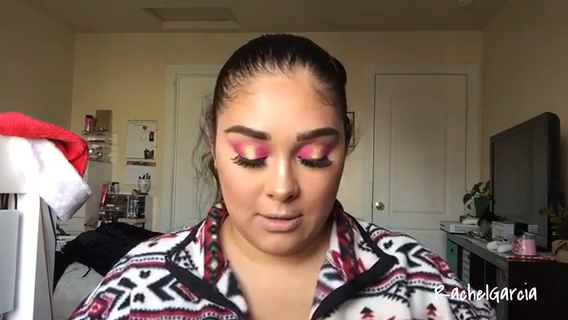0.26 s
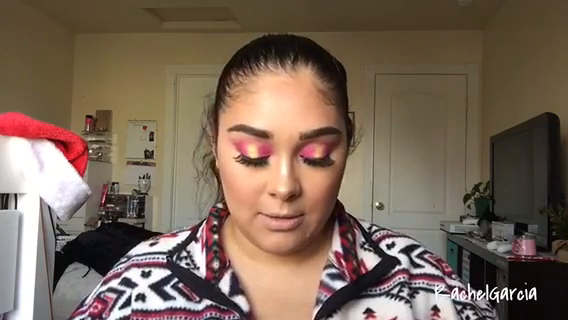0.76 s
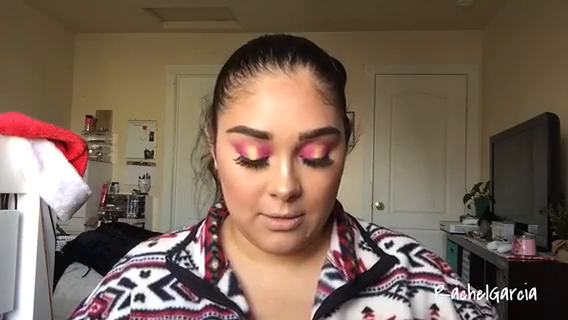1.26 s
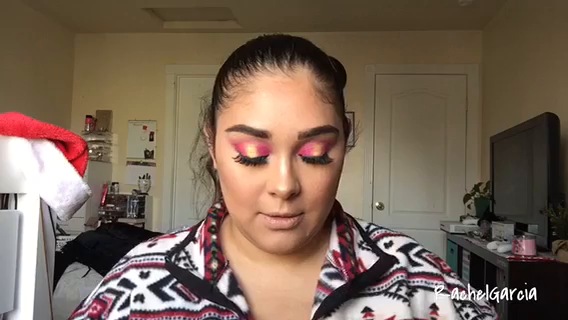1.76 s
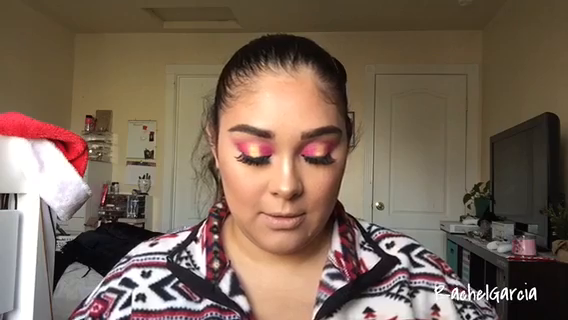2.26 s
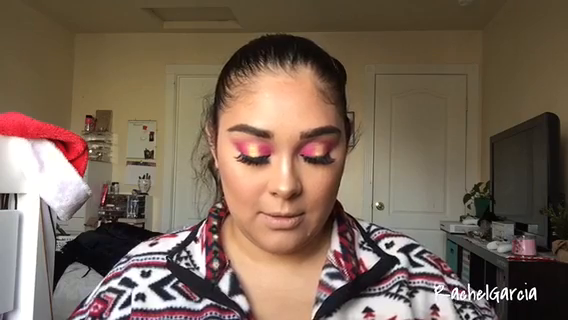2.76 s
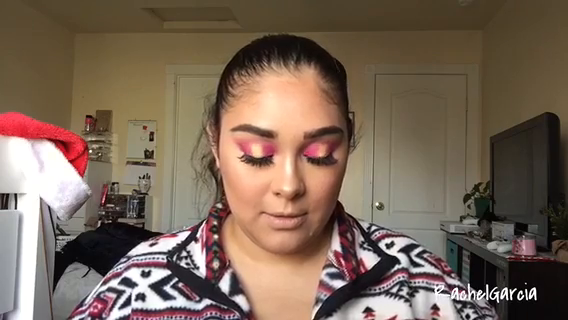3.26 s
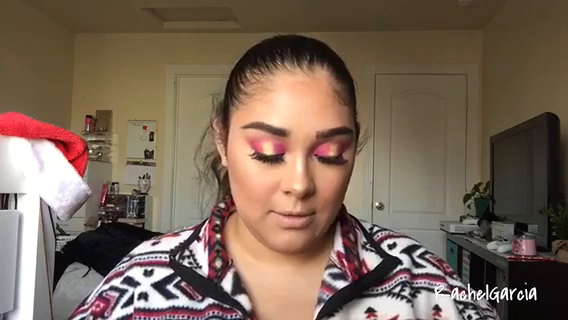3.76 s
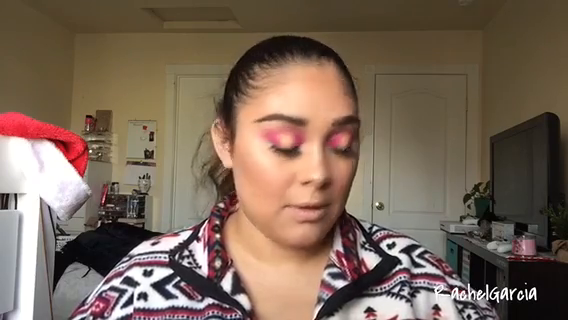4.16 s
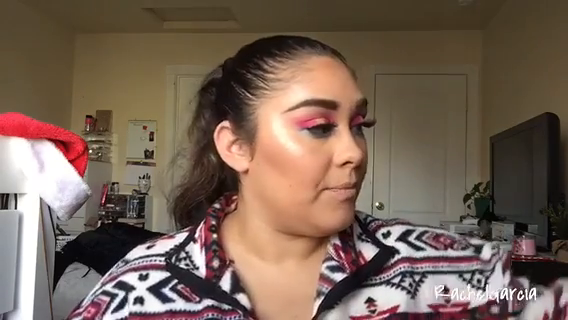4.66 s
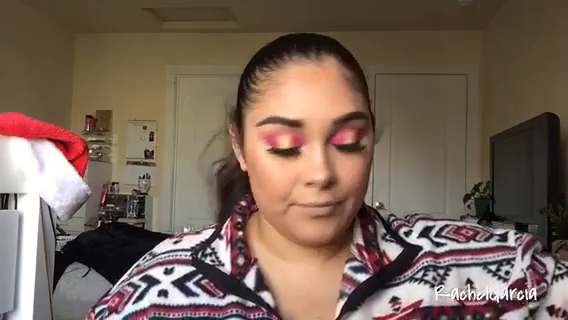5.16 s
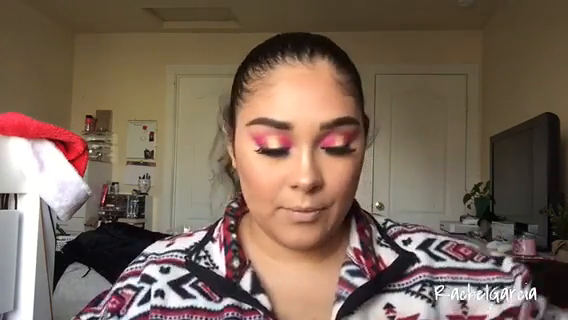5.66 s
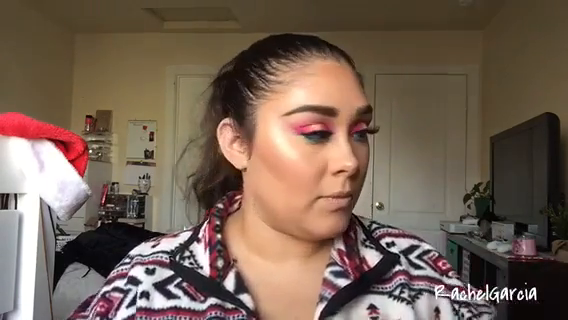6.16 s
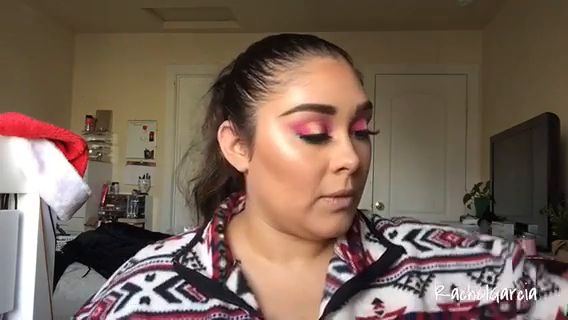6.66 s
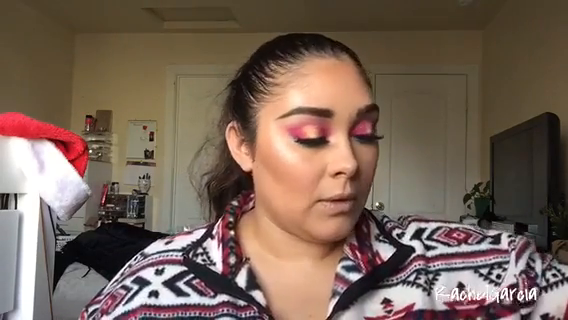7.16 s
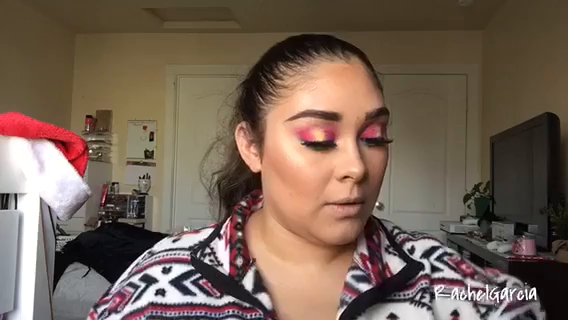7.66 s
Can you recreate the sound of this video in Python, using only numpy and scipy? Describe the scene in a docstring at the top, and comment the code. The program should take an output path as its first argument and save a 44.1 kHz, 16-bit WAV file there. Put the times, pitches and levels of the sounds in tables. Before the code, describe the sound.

Near the microphone in a small furnished bedroom, light plastic cosmetic cases are turned and tapped together. From 0 to 1.1 s the clicks are dense and irregular, with brief gritty rubs, a dull hand thump and the hardest snap near 0.77 s. From 1.2 to 3 s lighter taps continue, with firmer clicks around 1.9 and 2.3 s. A strong snap lands at 3.35 s, then clicks become sparse until 4.8 s. At 5.1-5.5 s cases rattle and scrape in a hollow tray with a thin ping; a cap scuffs and pings at 5.85-6.05 s. Small dry ticks dot the quiet to 6.9 s, under faint fleece brushing. At 7.1-7.35 s a louder run of hollow knocks and slides peaks near 7.32 s, with dull desk thumps. The short room decay leaves soft sleeve hiss over low air rumble and faint ventilation hum.

```python
"""Plastic cases handled in a bedroom

Small plastic cosmetic cases are turned, opened and snapped shut close to the microphone, then put away in a
hollow tray. Each tap is a short chatter of contacts ringing the shell; tray knocks add a damped hollow note.
Between them surfaces rub in stick-slip grains, a few small parts ping and a fleece sleeve brushes as smooth hiss.
Hands thump the desk dully. A small furnished bedroom answers as decaying noise; air rumble and ventilation
hum, made of filtered noise, lie below."""
import sys
import numpy as np
from scipy import signal
from scipy.io import wavfile
from scipy.ndimage import uniform_filter1d

SR = 44100
rng = np.random.default_rng(int(sys.argv[2]) if len(sys.argv) > 2 else 0)


def pcm_store(signal):
    """Save signal as 16-bit PCM."""
    levels = np.round(np.clip(np.atleast_2d(signal), -1, 1) * 32767)
    wavfile.write(sys.argv[1], SR, levels.astype(np.int16).T)


def how_loud(loudness_db):
    """Turn decibels into a plain amplitude multiplier (0 dB gives 1, 20 dB gives 10)."""
    steps = np.asarray(loudness_db, float) / 20
    return 10 ** steps


N = 348961  # length in samples

# Source levels in dB are set ahead of the shading hands, the room and the microphone chain.
# resonances of a case in three registers, hollow, middle, bright: centre_hz, width_hz, relative_db
CASE_MODES = [
    [(159, 59, -9.5), (350, 424, -2), (494, 108, 6.5), (780, 385, -1), (990, 2200, -5)],
    [(1250, 250, -5.5), (1650, 810, 9), (1804, 1370, 1.5), (2660, 160, -59)],
    [(3360, 280, -38), (3990, 2300, 28), (5300, 1700, 18), (6100, 3900, 25), (7200, 2800, -8),
     (10300, 1100, -11), (12500, 4800, -0.5)],
]
# resonances of the tray in the same registers: centre_hz, width_hz, relative_db
TRAY_MODES = [
    [(140, 31, -9), (388, 72, -3), (530, 75, -1.5), (700, 86, -2.5), (976, 66, 0.5), (1198, 167, -2.5),
     (1400, 140, -2)],
    [(1650, 166, 4.5), (2180, 240, 3), (2545, 210, 3), (3270, 1100, -4.5)],
    [(4530, 600, 4), (5600, 3600, -15), (5870, 7000, 6), (7550, 3400, 7.5), (9150, 1740, 1),
     (13500, 3000, -36)],
]


def taps():
    """Lids, hinges and shells meet in the hands; each adds the pitch of the shell and of the small edge struck."""
    # taps: start_s, peak_db of the middle part, shell_hz, hollow_db and bright_db relative to the middle
    tap_table = [(.044, -22.5, 1800, -5.5, -1.5), (0.073, -28, 1480, -13, -16), (.087, -29, 1304, -5, 8),
                 (0.1075, -24.5, 1640, -19, 9), (.131, -21, 1230, -4.5, -8), (.1515, -23, 1550, -0.5, 6),
                 (.184, -35.5, 1540, 5.5, -14), (0.2303, -11.5, 1585, -7.5, 6.5),
                 (.2763, -31, 1610, -8, -6), (0.3033, -18.5, 1350, -0.5, 1),
                 (0.3274, -24.5, 1340, -4.5, -6), (.4075, -39, 1790, -7, -17), (.429, -30.5, 1650, -3, 4.5),
                 (.4802, -22.5, 1570, -10, -1.5), (0.53, -43, 1250, -6, 11), (0.5522, -28.5, 1700, 5, 2),
                 (0.6108, -13.5, 2130, -16, -36), (.665, -27.5, 1660, -9, -26),
                 (0.7105, -23.5, 1820, -26, 1), (.7345, -12.5, 1650, -21, -3.5),
                 (0.7652, -5, 1950, -44, -0.5), (.844, -34.5, 1920, -19, -23), (.9001, -22.5, 1640, -11, 2),
                 (0.9827, -30, 1650, -29, -27), (1.005, -37, 1550, -15, -24), (1.0786, -24.5, 1440, -4, -8),
                 (1.1103, -36.5, 1850, 6.5, -30), (1.198, -42.5, 1590, -14, -2),
                 (1.2251, -38, 1670, -18, -7), (1.245, -37, 1590, -2, -5), (1.3347, -28.5, 1560, -27, -6.5),
                 (1.394, -29.5, 1800, -23, -3.5), (1.51, -35, 1970, -7, -10), (1.5222, -40, 1110, -10, -9),
                 (1.5434, -24.5, 1200, -16, -11), (1.594, -39, 1500, -3, 1), (1.6103, -22, 1500, -3.5, 1.5),
                 (1.6556, -35, 1630, -4, -7), (1.6728, -18, 1610, -24, 5.5), (1.7305, -36.5, 2100, -4, 0),
                 (1.765, -32.5, 1550, -22, -14), (1.7968, -38.5, 1400, -22, 5),
                 (1.9109, -15, 2180, -22, -5), (1.9295, -21, 1560, -32, -5.5),
                 (1.9572, -20, 1570, -28, -11), (2.088, -44, 1300, -23, 6.5),
                 (2.3115, -21.5, 1410, -8.5, -2), (2.3287, -20, 1500, -11, -6.5),
                 (2.3658, -28.5, 1650, -23, -5), (2.43, -38.5, 1700, -23, -12), (2.4602, -37, 2280, -25, 1),
                 (2.4869, -33.5, 1550, -16, -9), (2.5262, -32, 1590, -31, -8), (2.585, -42.5, 1500, -24, 1),
                 (2.6347, -29.5, 1450, -27, -6), (2.7033, -27, 1510, -30, -35),
                 (2.739, -33.5, 2000, -12, 2.5), (2.7564, -21.5, 1550, -12, 3),
                 (2.7707, -24, 1690, -13, -21), (2.8055, -31, 1480, -24, -18),
                 (2.8548, -34.5, 1400, -22, -5), (2.9038, -39, 1970, -24, -1.5),
                 (3.1162, -41, 2360, -14, -7), (3.1872, -35.5, 1500, -21, -7),
                 (3.2318, -30.5, 2180, -2.5, -4), (3.2593, -37, 1570, -21, -8),
                 (3.3495, -8.5, 2260, -4, -2), (3.516, -30.5, 2140, -22, -16),
                 (3.541, -21, 1450, -11.5, -3), (3.6838, -37.5, 2060, -1, -4),
                 (3.8818, -35, 2170, -9, -7.5), (3.9, -47, 1780, -15, -12), (4.3703, -19.5, 1500, -5, -15),
                 (4.3795, -32, 1570, -24, -21), (4.4214, -31, 1480, -14, -25),
                 (4.5502, -25.5, 1570, -11, 7.5), (4.593, -37.5, 1390, -20, 2),
                 (4.696, -34.5, 1750, -5, -7), (4.737, -47, 1460, -18, 4), (4.7648, -36, 2730, -8, -13)]
    start_s, peak_db, shell_hz, hollow_db, bright_db = np.transpose(tap_table)
    # sharper taps catch smaller, higher edges: 3800 Hz at full scale, 40 Hz per dB, with scatter
    scatter = np.exp(0.14 * rng.standard_normal(len(start_s)))
    edge_hz = np.clip((3800 + 40 * (peak_db + bright_db)) * scatter, 3000, 9000)
    # harder taps are cleaner snaps: the first contact stands further above the chatter
    burst = chatter(0.031 + 0 * start_s, first_db=25.5 + 0.56 * peak_db)
    hollow, middle, bright = [body(burst, modes, spread_db=3) for modes in CASE_MODES]
    middle = middle + how_loud(7) * own_ring(burst, shell_hz, sharpness=9.8)
    edge_ring = own_ring(own_ring(burst, edge_hz, sharpness=5.0), edge_hz, sharpness=2.3)
    bright = bright + how_loud(18) * edge_ring
    hollow = peak_at(hollow, peak_db + hollow_db)
    middle = peak_at(middle, peak_db)
    bright = peak_at(bright, peak_db + bright_db)
    return place(start_s, hollow + middle + bright)


def knocks():
    """A case bumps the tray: a hollow note swells and is damped within the contact; the tray booms, edges clatter."""
    # knocks in the tray: start_s, peak_db of the note, pitch_hz, clatter_db relative to the note, contact_s
    knock_table = [(5.092, -38, 938, 5.5, 0.026), (5.164, -29, 717, 0, .011),
                   (5.188, -15.5, 703, -4, 0.0091), (5.292, -25, 676, -11, 0.0086),
                   (5.313, -28, 990, -3, 0.015), (5.321, -25.5, 1000, 7.5, 0.016),
                   (5.332, -22.5, 660, 8.5, 0.026), (5.361, -25, 670, 1, 0.022),
                   (5.417, -31, 678, 11, 0.037), (5.46, -27.5, 1140, 10.5, .02),
                   (5.487, -40, 543, 13, .015), (5.853, -24, 493, 1.5, 0.0098),
                   (5.882, -29, 475, -18, 0.029), (5.915, -31, 470, -17, 0.011),
                   (5.987, -36, 1350, -1, 0.022), (6, -28.5, 1350, 7, 0.014),
                   (6.862, -38, 660, 6.5, 0.0095), (7.095, -21, 731, -24, 0.016),
                   (7.186, -12.5, 672, -8, .025), (7.244, -12, 707, -28, 0.013),
                   (7.262, -14.5, 687, -19, 0.017), (7.275, -13, 673, -19, 0.0081),
                   (7.305, -16.5, 680, -20, 0.0097), (7.315, -8, 1262, -3.5, 0.017),
                   (7.323, -2.5, 1135, -6, 0.0095)]
    # modes of the tray wall: centre_hz
    wall_hz = [1184, 1306]
    boom_db, bright_db = -15.5, -4.5  # relative to the note; relative to the middle clatter
    after_ring_db, after_ring_t60_s = -9, 0.3
    start_s, peak_db, pitch_hz, clatter_db, contact_s = np.transpose(knock_table)
    burst = chatter(2.2 * contact_s, first_db=5)
    t = np.arange(burst.shape[1]) / SR
    swell = np.sin(np.pi * np.clip(t / contact_s[:, None], 0, 1) ** 0.54) ** 1.5
    start_phase = rng.random((len(start_s), 1))
    note = swell * np.sin(2 * np.pi * (pitch_hz[:, None] * t + start_phase))
    hollow, middle, bright = [body(burst, modes, spread_db=3) for modes in TRAY_MODES]
    boom = peak_at(hollow, peak_db + boom_db)
    clatter = peak_at(middle, peak_db + clatter_db) + peak_at(bright, peak_db + clatter_db + bright_db)
    direct = place(start_s, peak_at(note, peak_db) + boom + clatter)
    # the knocks set the tray wall ringing on at its own two pitches
    wall_width_hz = np.log(1000) / (np.pi * after_ring_t60_s)
    wall = sum(resonate(direct, hz, wall_width_hz) for hz in wall_hz)
    return direct + how_loud(after_ring_db) * wall


def hand_rub():
    """Case scrapes on case in the hands, stick-slip grains ringing the case."""
    # strokes: start_s, length_s, level_db, brightness_db, swell_db from start to end
    strokes = [(.002, .04, -58, -3, 0), (.222, .008, -44, -4, 10), (.047, .024, -48.5, -2, 12),
               (.076, 0.037, -39, 1.5, 9), (.134, 0.031, -40, -7, -3), (.182, .023, -44, -3.5, -19),
               (.235, 0.024, -52, -11, -15), (.255, 0.05, -42.5, 7, 14), (.33, 0.096, -53, 3, -17),
               (.432, 0.025, -36.5, -2, -17.5), (.482, .012, -50, -2, -9), (.515, 0.048, -45.5, 0.5, 12),
               (.56, 0.032, -45, 2.5, 14), (.6, 0.021, -33, -3, -2), (.66, 0.07, -44.5, -8.5, 5),
               (.79, 0.12, -50, -13, -2), (.905, 0.06, -44.5, -7, -10), (.96, 0.059, -46.5, -10, -6),
               (1.105, 0.058, -41, -18.5, -25), (1.19, 0.062, -59.5, -3, 5), (1.4, 0.04, -52, -8, 0),
               (1.5, .04, -61, -13, 10), (1.73, .048, -53, -6, 7), (1.96, 0.0054, -39, -2, -20),
               (2.33, 0.018, -41, -20, -5), (2.37, .02, -40.5, -14, -4), (2.45, .024, -52, -0.5, 4),
               (2.61, 0.056, -54.5, -6, -1), (2.735, 0.041, -36.5, -19, 11), (3.14, .019, -64.5, 6, 7),
               (3.19, .005, -47, -6, 1), (3.262, 0.031, -45, -8, 2), (3.36, .04, -55, -14, -18),
               (4.374, 0.011, -40.5, -1.5, -38.5), (4.42, 0.017, -50, 5, -11), (4.505, 0.017, -48, -7, -5),
               (4.535, 0.028, -31.5, -11, -8), (4.57, .076, -48.5, -5.5, -7), (4.688, .022, -55, -6, 8)]
    # how a stroke reaches hollow, middle, bright: added_db, brightness_share (ratio)
    grip = [(-5, 0.42), (-0.5, 0), (-1, 0.98)]
    return rubbing(strokes, CASE_MODES, grip, release_s=0.0063, slips_per_s=4500.0, stutter_db=1.6, wander_db=4)


def tray_rub():
    """A case slides along the tray, stick-slip grains ringing the tray."""
    # strokes: start_s, length_s, level_db, brightness_db, swell_db from start to end
    strokes = [(5.09, 0.091, -49.5, -7, -20), (5.165, 0.021, -31.5, -12, -4),
               (5.197, 0.039, -31.5, -11, -21), (5.29, .022, -39, -8, -6), (5.314, 0.036, -25.5, -23, 4),
               (5.35, 0.043, -27.5, -8, -1), (5.405, 0.037, -28.5, -13, 1), (5.453, 0.034, -29, -11.5, -1),
               (5.485, 0.012, -28.5, -13.5, 0), (5.505, 0.063, -51, -25, -19), (6.335, .021, -51, -14, 1),
               (6.563, 0.013, -56, -5, -16), (6.86, 0.025, -45, -18, -11), (6.94, 0.057, -51.5, -11, -6),
               (7.0, 0.109, -49, -3, 7), (7.097, .021, -32, -39, -18.5), (7.132, 0.066, -31.5, -10.5, 13),
               (7.188, 0.01, -28, -8, -8), (7.205, 0.014, -43, -6, -13), (7.244, .011, -24, -12, -4),
               (7.262, 0.024, -23, -15, 4), (7.29, 0.041, -35, -4, 18), (7.335, .07, -44.5, -4, -15)]
    # how a stroke reaches hollow, middle, bright: added_db, brightness_share (ratio)
    grip = [(-0.12, 0.0088), (-0.78, 0.25), (-1.1, 1)]
    return rubbing(strokes, TRAY_MODES, grip, release_s=0.025, slips_per_s=4000.0, stutter_db=1.63, wander_db=4)


def cap_rub():
    """A hard cap is dragged aside, stick-slip grains ringing the cap."""
    # strokes: start_s, length_s, level_db, brightness_db, swell_db from start to end
    strokes = [(5.856, 0.033, -31.5, -6.5, -2.5), (5.912, 0.018, -40, -8, -10),
               (5.955, .0277, -39, -12.5, 11), (5.986, 0.028, -37.5, 1.5, -9),
               (6.01, 0.041, -44.5, -10, -11)]
    # resonances of the cap by register: centre_hz, width_hz, relative_db
    cap_modes = [
        [(472, 98, 0.5), (930, 140, -2.5), (1350, 420, -2.5)],
        [(1700, 220, 4.5), (2410, 690, -6.5), (3230, 650, -3.5)],
        [(3840, 490, 4.5), (4970, 630, 7), (6500, 1700, -13), (8040, 1100, -5), (12600, 3500, -37)],
    ]
    # how a stroke reaches hollow, middle, bright: added_db, brightness_share (ratio)
    grip = [(0, 0), (1.3, 0.5), (0, 1)]
    return rubbing(strokes, cap_modes, grip, release_s=0.012, slips_per_s=4500.0, stutter_db=2.0, wander_db=1.0)


def rubbing(strokes, registers, grip, release_s, slips_per_s, stutter_db, wander_db):
    """Each stroke bites at once, lets go a little more slowly and rings the body it slides on."""
    grain = slips(slips_per_s, 3.2, stutter_db, stutter_hz=62)
    added_db, share = np.transpose(grip)
    pressure = np.zeros((3, N))
    for start_s, length_s, level_db, brightness_db, swell_db in strokes:
        at, count = int(start_s * SR), max(int(length_s * SR), 2)
        register_db = level_db + added_db + share * brightness_db
        course_db = swell_db * np.linspace(-.5, .5, count)
        pressure[:, at:at + count] += how_loud(np.add.outer(register_db, course_db))
    keep = np.exp(-1 / (release_s * SR))
    lagging = signal.lfilter([1 - keep], [1, -keep], pressure)
    pressure = uniform_filter1d(np.maximum(pressure, lagging), size=40)
    out = 0
    for level, modes in zip(pressure, registers):
        out = out + level * rms_one(body(grain, modes, 0, wander_db)[0])
    return out


def pings():
    """A small hard part rings on: a thin, slightly rough ring."""
    # pings: start_s, peak_db, pitch_hz
    ping_table = [(5.489, -30, 4370), (7.155, -33, 2900), (5.856, -24, 4900)]
    start_s, peak_db, pitch_hz = np.transpose(ping_table)
    burst = chatter(0.13 + 0 * start_s, first_db=8)
    return place(start_s, peak_at(own_ring(burst, pitch_hz, sharpness=25.0), peak_db))


def ticks():
    """Short dry clicks, treble only, scattered between the louder handling."""
    # ticks: start_s, peak_db
    tick_table = [(3.808, -53), (4.247, -52), (4.275, -50), (5.8544, -36), (5.9704, -43), (6.061, -35),
                  (6.383, -40.5), (6.563, -27), (6.736, -42), (6.8104, -42), (6.9416, -47)]
    start_s, peak_db = np.transpose(tick_table)
    burst = chatter(.01 + 0 * start_s, first_db=8)
    return place(start_s, peak_at(body(burst, CASE_MODES[2], spread_db=3), peak_db))


def thumps():
    """Hands on the desk: the top gives a dull, soft-edged note."""
    # thumps: start_s, peak_db, pitch_hz
    thump_table = [(0.146, -30, 128), (0.298, -46, 140), (0.607, -33, 102), (2.301, -41, 102),
                   (5.189, -50, 116), (5.324, -40, 177), (5.383, -29, 240), (5.912, -31.5, 220),
                   (7.095, -34, 140), (7.263, -27, 140), (7.315, -42, 134)]
    start_s, peak_db, pitch_hz = np.transpose(thump_table)
    t = np.arange(3000) / SR
    note = t * np.exp(-t / 0.0033) * np.sin(2 * np.pi * pitch_hz[:, None] * t)
    return place(start_s, peak_at(note, peak_db))


def sleeve():
    """Fleece brushes as the arm reaches: fine smooth grain, broad and bright."""
    # level curve of each reach, silent-low outside it: time_s, level_db
    reaches = [
        [(4.5, -80), (4.58, -77), (4.706, -63), (4.848, -65), (5.05, -87)],
        [(6.02, -71), (6.45, -68)],
        [(6.85, -83), (7.034, -77), (7.2, -43)],
    ]
    grain = slips(per_s=12000, uneven_db=2, stutter_db=1.5, stutter_hz=15)[0]
    hiss = rms_one(resonate(resonate(grain, 5600.0, 10000.0), 9700.0, 9000.0))
    t = np.arange(N) / SR
    level = sum(how_loud(np.interp(t, *np.transpose(reach), left=-120, right=-120)) for reach in reaches)
    return hiss * level


def bedroom(x):
    """Diffuse reflections of a small furnished room: noise that swells in over 5 ms and dies band by band."""
    # decay bands of the room: low_hz, high_hz, t60_s, relative_db
    decay_bands = [(149, 820, 0.29, -14), (815, 1450, 0.37, -17), (1500, 4800, 0.23, -16),
                   (6000, 19000, 0.22, -12.5)]
    t = np.arange(SR // 2) / SR
    answer = 0
    for low_hz, high_hz, t60_s, db in decay_bands:
        band_pass = signal.butter(2, [low_hz, high_hz], "band", fs=SR, output="sos")
        band = signal.sosfilt(band_pass, rng.standard_normal(len(t)))
        decay_size = np.sqrt(t60_s * SR / (2 * np.log(1000)))  # evens out long and short decays
        answer = answer + how_loud(db - 60 * t / t60_s) * band / decay_size
    return signal.fftconvolve(x, answer * np.clip(t / .005, 0, 1))[:N]


def air():
    """Third-octave bands of steady noise, with the drone and faint whistles of the ventilation."""
    # spectrum of the air, density up to a common level: frequency_hz, relative_db per Hz
    spectrum = np.array([(6, 7.5), (14, 8), (24, -9), (38, -3.5), (68, -9), (113, -18), (255, -26),
                         (330, -28), (873, -32.5), (1370, -31), (2260, -37), (3630, -48.5), (14700, -64.5),
                         (16000, -69)])
    # ventilation drone and whistles: centre_hz, width_hz of each of two passes, rms_db
    hum = [(57.1, 7.9, -49.5), (443.7, 4.7, -65), (1021, 27, -67), (1379, 30, -77)]
    air_db = -35  # rms of all bands
    edges_hz = 7 * 2 ** np.arange(0, 11.3, 1 / 3)
    white = rng.standard_normal((2, N + SR))  # neighbouring bands take turns; a second of run-in
    rumble = 0
    for k, (low, high) in enumerate(zip(edges_hz, edges_hz[1:])):
        band_pass = signal.butter(2, [low, high], "band", fs=SR, output="sos")
        band = signal.sosfilt(band_pass, white[k % 2])[SR:]
        log_centre = np.log(low * high) / 2
        rumble = rumble + how_loud(np.interp(log_centre, np.log(spectrum[:, 0]), spectrum[:, 1])) * band
    whistles = 0
    for hz, width_hz, db in hum:
        tone = resonate(resonate(white[0, :N], hz, width_hz), hz, width_hz)
        whistles = whistles + how_loud(db) * rms_one(tone)
    return how_loud(air_db) * rms_one(rumble) + whistles


def chatter(t60_s, first_db):
    """A first contact followed by a dying burst of smaller ones."""
    t = np.arange(4000) / SR
    decay = how_loud(-60 * t / np.clip(t60_s, .002, .15)[:, None])
    burst = rng.standard_normal((len(t60_s), len(t))) * decay
    burst[:, 0] = -how_loud(first_db)
    return burst


def slips(per_s, uneven_db, stutter_db, stutter_hz):
    """Stick and slip: dense uneven micro-contacts that come in stutters."""
    born = rng.random(N) < per_s / SR
    size_db = uneven_db * np.minimum(rng.exponential(1, N), 4) + stutter_db * drift(stutter_hz)
    return (born * rng.choice([-1, 1], N) * how_loud(size_db))[None]


def body(x, modes, spread_db, wander_db=None):
    """Parallel resonances of alternate sign, band-limited; each row of x meets them with its own strengths."""
    luck = rng.standard_normal((len(x), len(modes)))
    ring = 0
    for k, (hz, width_hz, db) in enumerate(modes):
        # the shifting grip damps now one resonance, now another
        wander = 0 if wander_db is None else wander_db * drift(rate_hz=15.1)
        gain = how_loud(db + spread_db * luck[:, [k]] + wander)
        ring = ring + (-1) ** k * gain * resonate(x, hz, width_hz)
    edges_hz = [.75 * modes[0][0], min(1.3 * modes[-1][0], 16000)]
    return signal.sosfilt(signal.butter(2, edges_hz, "band", fs=SR, output="sos"), ring)


def own_ring(bursts, pitches_hz, sharpness):
    """Each burst rings at a pitch of its own; sharpness is pitch over width."""
    return np.array([resonate(one, hz, hz / sharpness) for one, hz in zip(bursts, pitches_hz)])


def resonate(x, hz, width_hz):
    """Two-pole resonance, gain 1 on top."""
    r = np.exp(-np.pi * width_hz / SR)
    feed = (1 - r * r) / 2 * np.array([1, 0, -1])
    return signal.lfilter(feed, [1, -2 * r * np.cos(2 * np.pi * hz / SR), r * r], x)


def drift(rate_hz):
    """Slow random wander of spread 1, drawn at every 40th sample and joined by straight lines."""
    r = np.exp(-80 * np.pi * rate_hz / SR)
    draws = rng.standard_normal(N // 40 + 1002)
    slow = signal.lfilter([1], [1, -2 * r, r * r], draws)[1000:]  # past the run-in
    return np.interp(np.arange(N) / 40, np.arange(len(slow)), rms_one(slow))


def rms_one(x):
    """Scale to unit power."""
    return x / np.sqrt(np.mean(x ** 2) + 1e-20)


def peak_at(rows, db):
    """Give each row its peak level."""
    return rows / np.abs(rows).max(axis=1, keepdims=True) * how_loud(db)[:, None]


def place(times_s, rows):
    """Lay the rows out at their moments."""
    out = np.zeros(N + rows.shape[1])
    for at, one in zip((times_s * SR).astype(int), rows):
        out[at:at + len(one)] += one
    return out[:N]


def scene():
    """Near handling, its top gently rolled off, with its room sound and the steady air."""
    strokes = hand_rub() + tray_rub() + cap_rub()
    near = taps() + knocks() + ticks() + pings() + thumps() + strokes + sleeve()
    near = signal.sosfilt(signal.butter(1, 11000, fs=SR, output="sos"), near)
    return (near + bedroom(near) + air())[None]


def low_pass(x):
    """Removes everything above the highest recorded frequency."""
    return signal.sosfilt(signal.butter(12, 16790, fs=SR, output="sos"), x)


def record(dry):
    """The microphone chain cuts the very top and rounds the highest peaks."""
    top_cut = signal.cheby2(8, 30, 16600, fs=SR, output="sos")  # 30 dB down from 16.6 kHz up
    cut = signal.sosfilt(top_cut, dry)
    mix = 1.318 * np.tanh(cut / 1.431)
    return low_pass(mix)


dry = scene()
out = record(dry)
pcm_store(out)
```